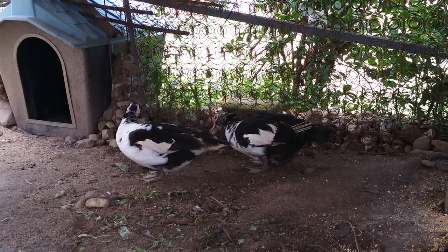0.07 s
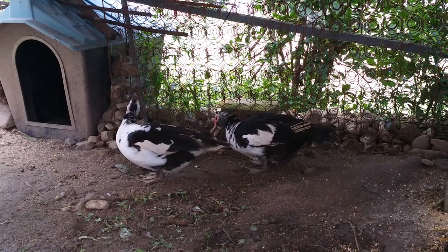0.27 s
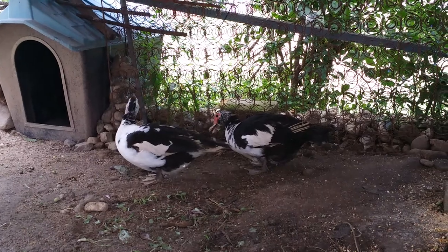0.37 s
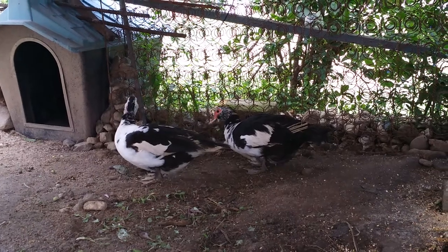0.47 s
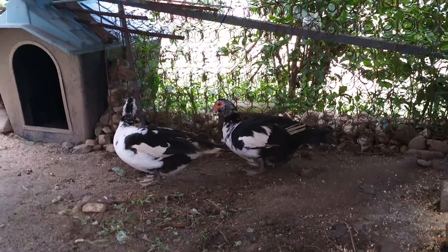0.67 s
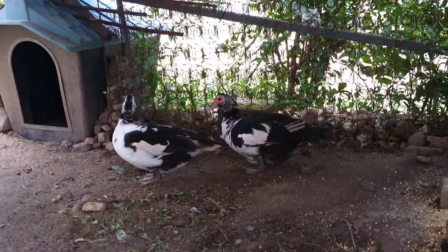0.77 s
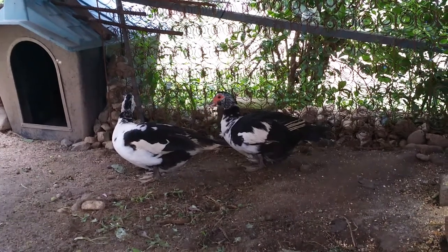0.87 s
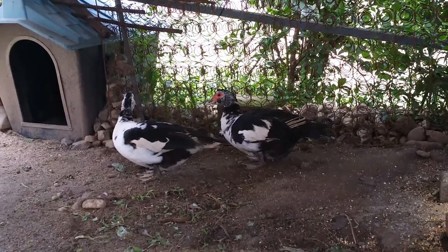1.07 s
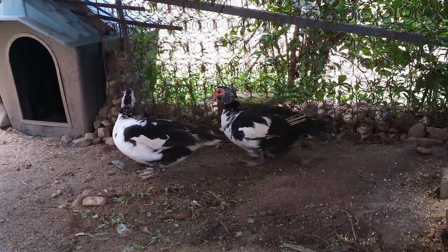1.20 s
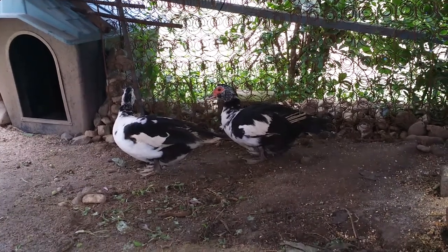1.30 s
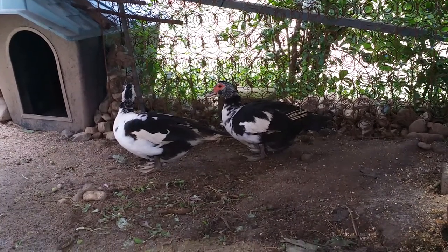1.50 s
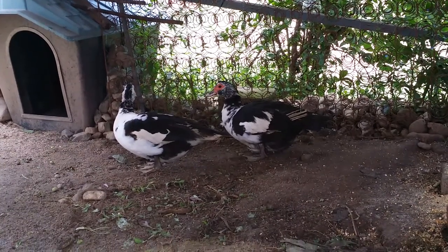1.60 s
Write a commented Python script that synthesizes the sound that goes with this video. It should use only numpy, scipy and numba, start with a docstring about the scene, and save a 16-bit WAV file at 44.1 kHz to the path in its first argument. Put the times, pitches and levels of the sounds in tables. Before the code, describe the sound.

A duck hisses once, then gives a run of short breathy huffs outdoors.

```python
"""Ducks hiss in an outdoor pen, close on the right, by forcing turbulent air through the throat.
One long hiss starts as a thin whistle, opens into a hoarse rush as the throat widens, and stops dead;
a dull thump and a run of short breathy huffs follow. Nearby surfaces reflect the hiss and the huffs.
Behind them are faint hisses on the left, two falling chirps, the harmonic hum of a far motor,
a low rumble and a steady outdoor wash."""
import sys
import numpy as np
from scipy import signal
from scipy.fft import rfft, irfft
from scipy.io import wavfile
from scipy.ndimage import map_coordinates
from numba import njit

SR = 44100
rng = np.random.default_rng(int(sys.argv[2]) if len(sys.argv) > 2 else 0)


def wrap_up_sound(samples):
    """Save the sound to the file named by the first command line argument, as 16-bit audio."""
    columns = np.atleast_2d(samples).T
    # keep every value between -1 and 1, then stretch to whole-number steps
    tamed = np.clip(columns, -1, 1)
    steps = np.round(tamed * 32767).astype(np.int16)
    wavfile.write(sys.argv[1], SR, steps)


N = 72765

# Air flow of the long hiss. Each row: time in seconds, relative level in dB.
HISS_FLOW = [(0, -65.5), (0.138, -42.5), (0.198, -44.5), (.27, -35.5), (.34, -33.5), (0.388, -26.5),
             (.56, -24.5), (.632, -30.5), (.65, -54.5)]
# Spectra of the air jet and the hoarse rush. Each row: frequency in Hz, relative density in dB.
JET_SPECTRUM = [(200, -14), (1000, -3.5), (1900, 3.5), (2900, -3), (4800, 0), (6000, 0.5), (9800, -9.5),
                (12000, -4), (15500, -10)]
RASP_SPECTRUM = [(60, 4.5), (150, 7), (350, -1.5), (600, 1.5), (1250, -3), (1900, -12), (2800, -24),
                 (6000, -43)]
# Short huffs. Each row: start, length and attack in seconds, airway level in dB,
# throat body and sibilance in dB relative to the airway.
HUFF_EVENTS = [(0.724, 0.06, 0.01, -45, -12, -15), (0.78, 0.01, 0.0027, -43, 10.5, -12),
               (0.873, 0.063, .003, -38, 6, -17), (1.018, 0.065, 0.076, -42, -13, -15.5),
               (1.117, 0.034, 0.021, -41, -3, -19), (1.166, .05, 0.042, -31.5, -23, -13),
               (1.286, 0.036, 0.017, -41.5, 0.5, -16), (1.345, 0.048, 0.035, -40.5, -4.5, -16),
               (1.415, .035, .025, -45, 0, -19), (1.555, 0.043, .025, -42.5, -0.5, -15)]
# Spectra of the three parts of a huff. Each row: frequency in Hz, relative density in dB.
AIRWAY_SPECTRUM = [(300, -10), (800, 5), (1400, -2.5), (2400, 5), (3900, -3), (5300, -2.5), (6600, -14),
                   (11000, -26), (15500, -44)]
BODY_SPECTRUM = [(40, -7), (110, 3), (300, -3), (800, -7), (1500, -5.5), (2100, -9), (3200, -34),
                 (8000, -34)]
SIBILANCE_SPECTRUM = [(3000, -25), (7000, 2.5), (10000, 7), (12000, 5.5), (15500, -11)]
# Hisses from farther off. Each row: start in seconds, length in seconds, level in dB.
FAR_HISS_EVENTS = [(0.128, 0.19, -54.5), (1.002, 0.067, -49.5), (1.17, 0.055, -56)]
# Falling chirps. Each row: time of the peak in seconds, pitch there in Hz, level in dB.
CHIRP_EVENTS = [(.832, 1590, -47), (1.109, 1660, -47)]
# Motor hum. Each row: harmonic number, peak level in dB.
MOTOR_HARMONICS = [(1, -60), (2, -50), (3, -51.5), (4, -53.5)]
# Spectra of the outdoor wash on each side. Each row: frequency in Hz, relative density in dB.
WASH_LEFT_SPECTRUM = [(20, -20), (60, -41), (200, -2.5), (330, 0), (550, 1), (850, 5), (1400, -1.5),
                      (2400, -6.5), (4000, -13.5), (6600, -8), (8600, -24), (15500, -26.5)]
WASH_RIGHT_SPECTRUM = [(20, -12), (60, 4), (200, 3.5), (400, 1), (950, 4), (1600, -3.5), (2600, -9.5),
                       (4500, -14), (6500, -23.5), (9500, -27), (15500, -27.5)]


def long_hiss():
    """Turbulence excites the throat's resonances; as it widens, the whistle yields to a hoarse rush."""
    t = clock()
    times, flow_db = np.array(HISS_FLOW).T
    flow = undb(np.interp(t, times, flow_db)) * envelope(0, times[-1], attack=.002, release=.005)
    opens_s, opening_time_s = .23, .4
    opening = np.clip((t - opens_s) / opening_time_s, 0, 1)  # 0 is narrow, 1 wide open
    jet = noise(JET_SPECTRUM) * flutter(rate=350, depth_db=1.5)
    whistle = undb(-15.5 * opening) * resonance(hz=8740, width_hz=4100)
    # The whistle spreads briefly; later a hollow ring marks the height of the hiss.
    flare = undb(-5) * envelope(.235, .065, .034, .011) * resonance(hz=9300, width_hz=4000)
    ring = undb(-2) * envelope(.445, .17, .036, .098) * resonance(hz=866, width_hz=740)
    # The rush grows louder and its lower edge sinks as the throat widens.
    edge_hz = np.interp(opening, [0, 1], [860, 97])
    turbulence = noise(RASP_SPECTRUM) * flutter(rate=260, depth_db=.5)
    _, rasp = state_variable_filter(turbulence, edge_hz, 1.69 * edge_hz)
    return flow * (jet + whistle + flare + ring + undb(-11.5 + 18.5 * opening) * rasp)


def huffs():
    """Puffs of turbulent air share one airway; the spectral balance makes each throaty or sharp."""
    airway, body, sibilance = noise(AIRWAY_SPECTRUM), noise(BODY_SPECTRUM), noise(SIBILANCE_SPECTRUM)
    out = np.zeros(N)
    for start, length, attack, db, body_db, sibilance_db in HUFF_EVENTS:
        air = airway + undb(body_db) * body + undb(sibilance_db) * sibilance
        out += undb(db) * envelope(start, length, attack, release=.02) * air
    return out * flutter(rate=190, depth_db=1)


def hiss_end():
    """Band-limited noise ends the hiss: a low band buffets, then a narrow high one squeaks and sinks."""
    gust = envelope(.572, .058, attack=.01, release=.025) * resonance(hz=105, width_hz=290)
    squeak_s, sag_hz_per_s = .645, 3300
    squeak_hz = 11100 - sag_hz_per_s * (clock() - squeak_s)
    squeak = envelope(squeak_s, .055, attack=.01, release=.02) * resonance(squeak_hz, width_hz=300)
    return undb(-36.5) * gust + undb(-63) * squeak


def thump():
    """A heavily damped oscillation dies in about a cycle and is heard as a knock; a tiny tick follows."""
    start_s, knock_hz, decay_s = .7738, 1220, .00036
    age = np.maximum(clock() - start_s, 0)
    knock = np.sin(2 * np.pi * knock_hz * age) * np.exp(-age / decay_s)
    tick = noise(SIBILANCE_SPECTRUM) * envelope(.7768, .0002, attack=.0002, release=.0004)
    return undb(-5.5) * knock + undb(-36) * tick


def reflections(direct, count=8):
    """Echoes from nearby surfaces interfere with the direct sound and ripple its spectrum."""
    spread_s, echo_gain = .006, undb(-11.5)
    delays_s = spread_s * (np.arange(count) + rng.random(count)) / count
    lags = (delays_s * SR).astype(int) + 1
    echoes = sum((-1) ** k * np.pad(direct, (lag, 0))[:N] for k, lag in enumerate(lags))
    return (direct + echo_gain * echoes / np.sqrt(count)) / np.hypot(1, echo_gain)


def far_hisses():
    """Distant hisses are soft-edged bursts of one noise band, partly masked by the background."""
    level = sum(undb(db) * envelope(start, length, attack=.044, release=.018)
                for start, length, db in FAR_HISS_EVENTS)
    return level * resonance(hz=4760, width_hz=4100)


def chirps():
    """Noise in a narrow, falling resonance gives husky notes, each under a Gaussian envelope."""
    spread_s, fall_per_s = .0084, 10
    out = np.zeros(N)
    for peak_s, hz, db in CHIRP_EVENTS:
        age = np.clip(clock() - peak_s, -4 * spread_s, 4 * spread_s)
        level = undb(db) * np.exp(-(age / spread_s) ** 2 / 2)
        out += level * resonance(hz * np.exp(-fall_per_s * age), width_hz=350)
    return out


def motor():
    """The periodic motion of a far motor gives a wavering harmonic series; the hum booms once."""
    fundamental_hz, boom_hz = 52.1, 101.7
    turns = np.cumsum(fundamental_hz * (1 + .0058 * walk(rate=6.99))) / SR
    hum = np.zeros(N)
    for harmonic, db in MOTOR_HARMONICS:
        level = undb(db) * flutter(rate=9.47, depth_db=2)
        hum += level * np.sin(2 * np.pi * (harmonic * turns + rng.random()))
    boom = envelope(1.2, .15, attack=.017, release=.024) * np.sin(2 * np.pi * boom_hz * clock())
    return hum + undb(-42.5) * boom


def outdoor_wash():
    """Uncorrelated noise on the two sides sounds wide; a distant rumble, alike on both, sounds central."""
    left = undb(-47) * noise(WASH_LEFT_SPECTRUM)
    right = undb(-41.5) * noise(WASH_RIGHT_SPECTRUM)
    wash = np.array([left, right]) * flutter(rate=8.98, depth_db=.4)
    rumble = undb(-54) * resonance(hz=114, width_hz=280)
    return wash + rumble


def undb(db):
    """Amplitude grows tenfold for every 20 dB."""
    return 10 ** (np.asarray(db) / 20)


def unit(x):
    """Normalisation to an rms of 1."""
    return x / np.sqrt(np.mean(x ** 2))


def clock():
    """Uniform sample times in seconds."""
    return np.arange(N) / SR


def noise(spectrum):
    """Spectral shaping colours white noise by (Hz, dB) points; the rms is 1."""
    hz, db = np.array(spectrum, float).T
    bin_hz = np.maximum(np.arange(N + 1) * SR / (2 * N), 1)
    colour = undb(np.interp(np.log(bin_hz), np.log(hz), db))
    low_cut = np.minimum(bin_hz / hz[0], 1) ** 2
    white = rfft(rng.standard_normal(2 * N))
    return unit(irfft(white * colour * low_cut)[:N])


def walk(rate):
    """Interpolation joins rate random values a second into a smooth curve of rms 1."""
    steps = rng.standard_normal(4096)
    return unit(map_coordinates(steps, [clock() * rate], order=3, mode="mirror"))


def flutter(rate, depth_db):
    """Random amplitude modulation: an uneven gain of rms 1."""
    return unit(undb(depth_db * walk(rate)))


@njit
def state_variable_filter(x, hz, width_hz):
    """Two integrators in a loop form a tunable resonator; it returns band-pass and high-pass."""
    out = np.empty((2, len(x)))
    band_state, low_state = 0., 0.
    for i in range(len(x)):
        gain, damping = np.tan(np.pi * hz[i] / SR), width_hz[i] / hz[i]
        band = (band_state + gain * (x[i] - low_state)) / (1 + gain * (gain + damping))
        low = low_state + gain * band
        band_state, low_state = 2 * band - band_state, 2 * low - low_state
        out[0, i] = damping * band
        out[1, i] = x[i] - damping * band - low
    return out


def resonance(hz, width_hz):
    """Two resonators in cascade, each width_hz wide, pass a steep noise band whose centre may move."""
    hz, width_hz = hz * np.ones(N), width_hz * np.ones(N)
    band = rng.standard_normal(N)
    for _ in range(2):
        band = state_variable_filter(band, hz, width_hz)[0]
    return unit(band)


def envelope(start, length, attack, release):
    """A linear rise centred on the start, a hold and an exponential decay, all in seconds."""
    age = clock() - start
    rise = np.clip(age / attack + .5, 0, 1)
    return rise * np.exp(-np.maximum(age - length, 0) / release)


def scene():
    """A level difference places the near ducks on the right, over a wide background that fades in."""
    near = reflections(long_hiss() + huffs()) + hiss_end() + thump()
    left = undb(-39) * near + far_hisses()
    fade_s, fade_from_db = .17, -10.5
    fade_in = undb(fade_from_db * np.maximum(1 - clock() / fade_s, 0))
    background = chirps() + motor() + outdoor_wash()
    return np.array([left, near]) + fade_in * background


def record(dry):
    """A steep elliptic low-pass filter limits the bandwidth."""
    cutoff_hz = 15650
    return signal.sosfilt(signal.ellip(10, .2, 80, cutoff_hz, fs=SR, output="sos"), dry)


dry = scene()
out = record(dry)
wrap_up_sound(out)
```